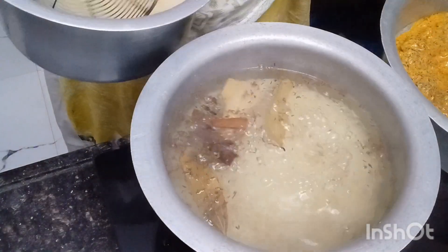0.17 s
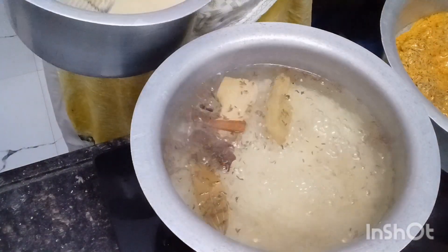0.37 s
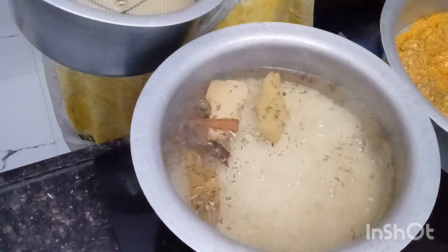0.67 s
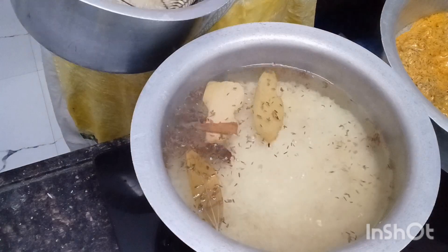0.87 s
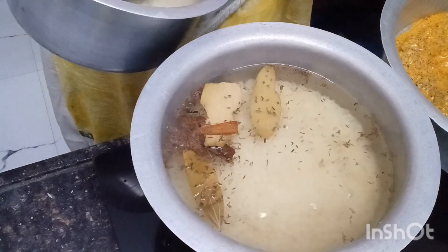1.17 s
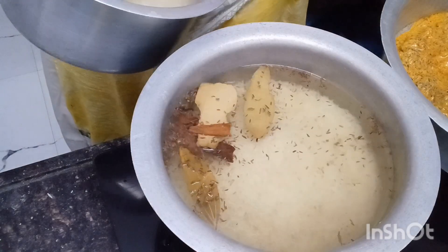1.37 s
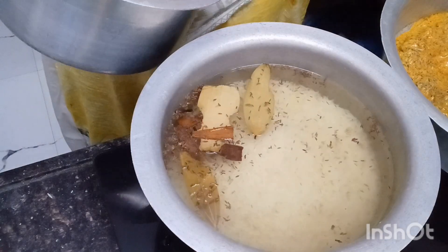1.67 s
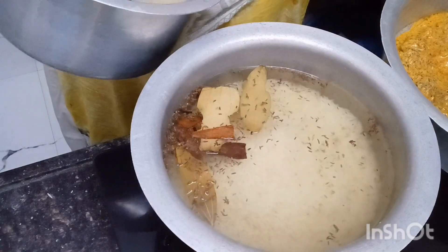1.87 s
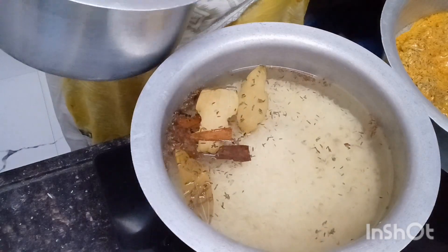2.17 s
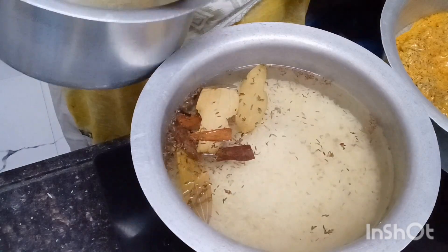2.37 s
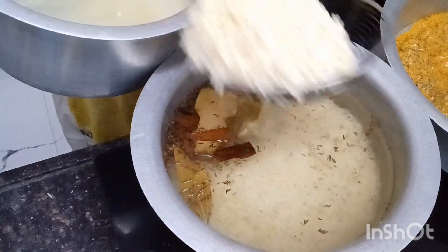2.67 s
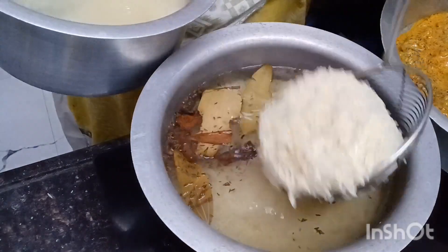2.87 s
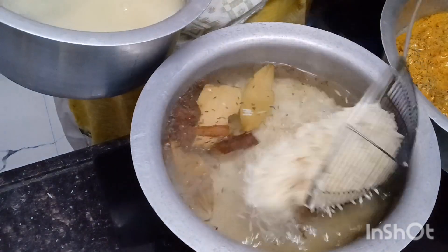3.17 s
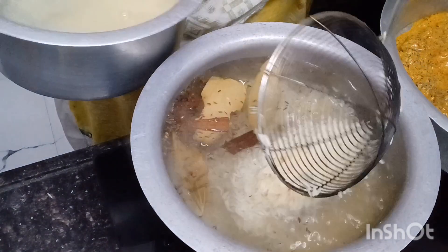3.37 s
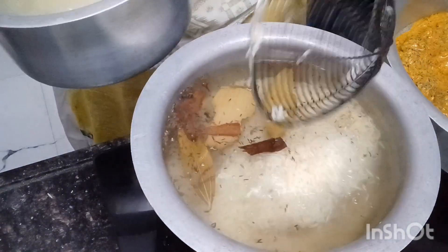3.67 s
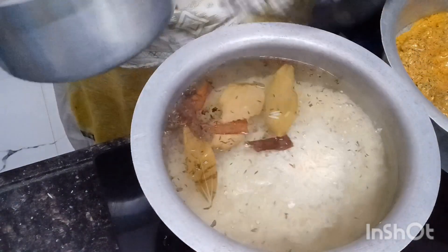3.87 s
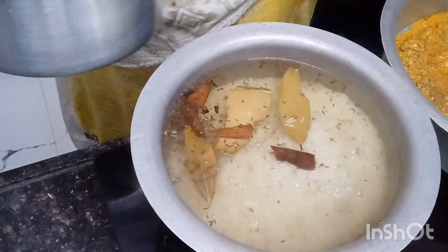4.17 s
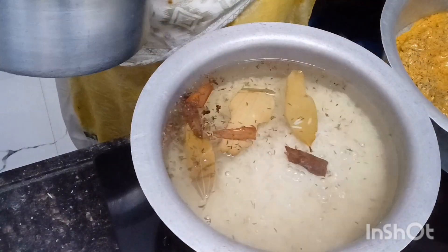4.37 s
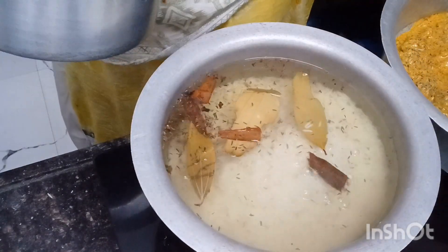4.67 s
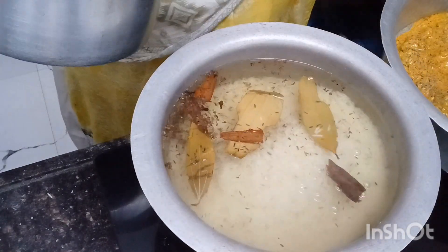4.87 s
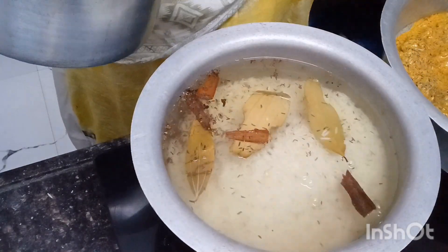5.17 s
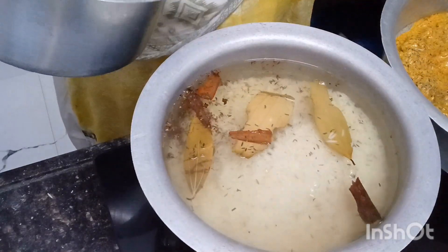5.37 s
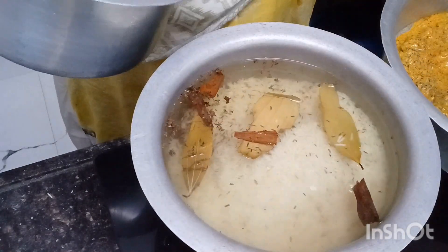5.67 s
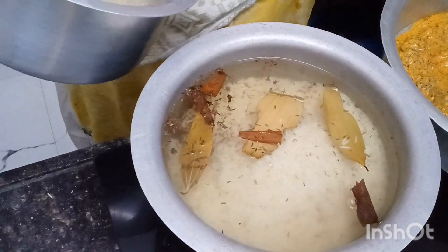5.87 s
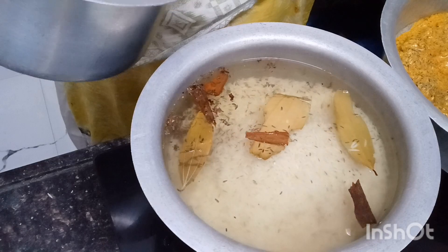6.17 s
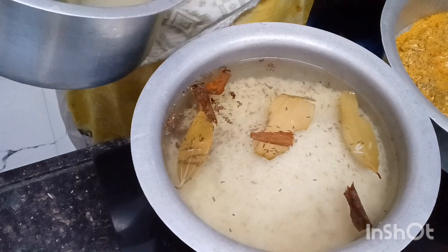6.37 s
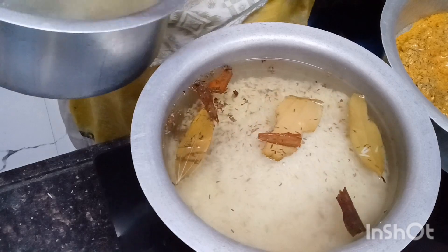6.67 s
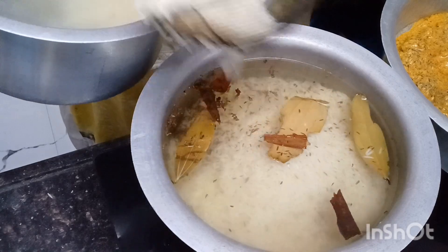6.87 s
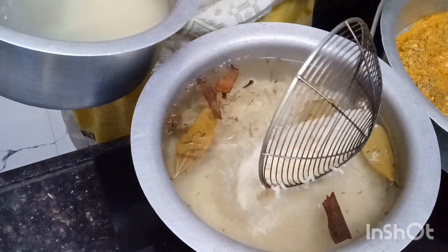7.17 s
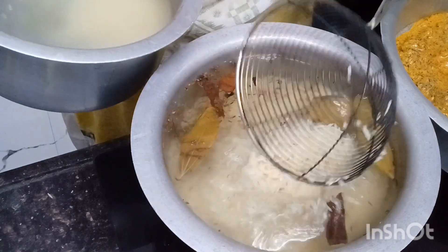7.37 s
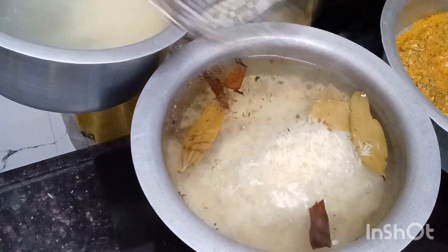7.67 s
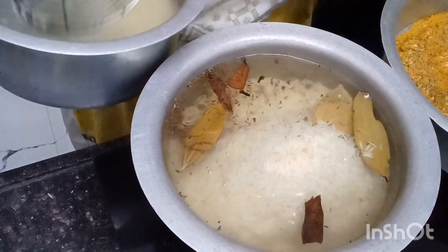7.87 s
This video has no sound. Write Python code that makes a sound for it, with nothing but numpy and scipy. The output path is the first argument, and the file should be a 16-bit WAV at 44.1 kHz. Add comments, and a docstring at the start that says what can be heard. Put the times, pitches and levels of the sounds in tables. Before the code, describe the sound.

In a small, hard, echoing kitchen, a wire skimmer knocks and drags grittily along a thin metal pot, then wet rice plops into water with a short grainy splash near three seconds. After a lull come loud clanks, the strongest ringing just past five, a scrape with gurgles, lighter ticks, a second splash at seven and a final bright clink. Close stereo microphone, slightly left; faint bird, hum and room tone behind.

```python
"""A small hard kitchen: a wire skimmer scrapes wet rice out of a thin metal pot, knocks on its wall
and tips the rice into water. Bursts and gritty slips ring the modes of pot and skimmer; grains are showers
of clicks; drips, gulps, plinks, a brief ring of the struck skimmer and bubbles are short climbing tones.
Brief echoes answer from the room. Behind lie faint whistling hiss, a bird chirping outside, a low hum
and room tone. The stereo microphone colours each side differently."""
import sys
import numpy as np
from scipy import signal
from scipy.fft import rfft, irfft, next_fast_len
from scipy.io import wavfile
from scipy.ndimage import uniform_filter1d

SR = 44100
rng = np.random.default_rng(int(sys.argv[2]) if len(sys.argv) > 2 else 0)


def log_audio(samples):
    """Write samples as a 16-bit WAV file to the path given in sys.argv[1]."""
    # one column per channel
    frames = np.atleast_2d(samples).T
    # limit to full scale, then quantise
    limited = np.clip(frames, -1, 1)
    pcm = np.round(limited * 32767).astype(np.int16)
    wavfile.write(sys.argv[1], SR, pcm)


N = 353682  # length [samples]


def gain_of(db):
    """Decibels to amplitude."""
    return 10 ** (np.asarray(db) / 20)


def evened(x):
    """Scales to rms 1."""
    return x / np.sqrt(np.mean(abs(x) ** 2) + 1e-20)


def unit(x):
    """Scales a response to energy 1."""
    return x / np.sqrt(np.sum(x ** 2, -1, keepdims=True) + 1e-20)


def read(points, hz):
    """Table value on a log-frequency axis."""
    f, value = np.transpose(points)
    return np.interp(np.log(hz + 1), np.log(f + 1), value)


def add(mix, s, sound):
    """Mixes a sound in at time s [s]."""
    part = mix[..., max(round(s * SR), 0):][..., :sound.shape[-1]]
    part += sound[..., :part.shape[-1]]


def played(rows):
    """Start time, and the curve columns at every sample of their span."""
    s, *columns = np.transpose(rows)
    t = np.arange(s[0], s[-1], 1 / SR)
    return s[0], [np.interp(t, s, c) for c in columns]


def resonate(x, hz, width):
    """Shifts the curve hz down to zero, smooths, and shifts back: a resonance of gain 1."""
    turn = np.exp(2j * np.pi * np.cumsum(hz * np.ones(len(x))) / SR)
    r = np.exp(-np.pi * width / SR)
    return 2 * (turn * signal.lfilter([1 - r], [1, -r], x / turn + 1e-18)).real


def causal(points, size=2048):
    """Minimum-phase response of a spectrum."""
    hz = abs(np.fft.fftfreq(size, 1 / SR))
    log_gain = np.log(gain_of(np.maximum(read(points, hz), -100)))
    return np.fft.ifft(np.exp(log_gain - 1j * signal.hilbert(log_gain).imag)).real[:size // 2]


def grit(count, per_s, spread_db):
    """Random tiny clicks, a few of them large."""
    loudness_db = spread_db * np.minimum(rng.exponential(1, count), 5)
    size = gain_of(loudness_db) * rng.choice([-1., 1.], count)
    return evened(size * (rng.random(count) < per_s / SR))


def lumps(count, seconds, depth_db):
    """Uneven random surges of level."""
    span = max(round(seconds * SR), 1)
    wander = uniform_filter1d(uniform_filter1d(rng.standard_normal(count), span), span)
    return evened(gain_of(depth_db * evened(wander)))


def noise_bands(rows):
    """Narrow wavering bands of noise."""
    size = next_fast_len(N, True)
    hz = np.fft.rfftfreq(size, 1 / SR)
    shape = sum(gain_of(db) * unit(1 / (1 + (2 * (hz - f) / width) ** 2)) for f, width, db in rows)
    spectrum = rfft(rng.standard_normal(size), norm="ortho") * np.sqrt(2)
    return size / 2 * irfft(shape * spectrum, size)[:N]


# how long the kitchen rings: (frequency [Hz], t60 [s])
KITCHEN_DECAY = [(300, 0.46), (1000, 0.41), (3000, 0.5), (7000, 0.35), (14000, 0.29)]
# how alike its echoes are left and right: (frequency [Hz], likeness [0-1])
KITCHEN_LIKENESS = [(300, 0.81), (800, 0.6), (1500, 0.018)]


def kitchen(wet_db, lag_s):
    """Direct sound, later at the right port, and sparse echoes whose bands die at their own speed."""
    taps = np.zeros((2, SR // 2))
    at = np.arange(60, SR // 2 - 20, 20)
    at = at + rng.integers(0, 20, (2, len(at)))
    np.put_along_axis(taps, at, rng.choice([-1., 1.], at.shape), 1)
    hz, t, z = signal.stft(taps, SR, nperseg=256)
    same = np.clip(read(KITCHEN_LIKENESS, hz), -1, 1)[:, None]
    z = np.array([z[0], same * z[0] + np.sqrt(1 - same ** 2) * z[1]])
    dying = gain_of(-60 * t / read(KITCHEN_DECAY, hz)[:, None])
    tail = signal.istft(z * dying, SR, nperseg=256)[1]
    direct = np.zeros_like(tail)
    direct[0, 0] = direct[1, max(round(lag_s * SR), 0)] = 1
    return unit(direct + gain_of(wet_db) * unit(tail))


# the five bands thud, boom, clang, clink, fizz: centre [Hz]
BAND_HZ = [200, 550, 1400, 3700, 10000]


def through(drive, body, room):
    """Each band of the drive excites its own part of the body, heard in the room; bands cross-fade."""
    size = next_fast_len(N + SR, True)
    hz = np.fft.rfftfreq(size, 1 / SR)
    heard = rfft(body, size) * rfft(room, size)
    parts = (evened(heard * read(list(zip(BAND_HZ, row)), hz)) for row in np.eye(len(BAND_HZ)))
    return irfft(sum(rfft(d, size) * p for d, p in zip(drive, parts) if d.any()), size)[:, :N]


def ringing(modes, colour):
    """Response of a metal body: its modes stand over a broad colour."""
    click = np.eye(1, 16384)[0]
    modal = sum(gain_of(db) * resonate(click, hz, width) for hz, width, db in modes)
    return signal.fftconvolve(click + modal, causal(colour))


# blows: (time [s], relative clang level [dB], brightness [dB/octave], narrowness [dB/octave^2],
#         rattle t60 [s], left over right [dB], energy share of the skimmer [0-1])
KNOCKS = [(0.237, -34.5, 4.5, 1.5, 0.051, 5, 0.03), (0.527, -13.5, 2.5, 1.5, 0.07, 4.5, 0.37),
          (1.677, -10.5, 2.5, 0.5, 0.029, 2.5, 0.71), (2.41, -20, -2, 0.5, 0.28, 2.5, 0.45),
          (2.678, -44.5, 5.5, 1.5, 0.054, 1, 0.93), (2.739, -27.5, 6.5, 3, 0.11, 2, 0.35),
          (2.798, -27, 3.5, 1.5, 0.023, 4, 0.54), (2.921, -23.5, 9.5, 2.66, 0.056, 0.5, 0),
          (3.04, -28, -6.5, 2.5, .1, 3, 0.14), (4.269, -29.5, 8, 5.5, 0.25, 4, 0.4),
          (4.569, -1.5, 4.5, 1.24, 0.03, 2, 0.43), (5.024, -5.5, 2.5, 0.87, 0.046, 1.5, 0.26),
          (5.104, 7.5, 1.27, 1.27, 0.19, 2, 0.01), (5.319, -10, 0.5, 1, 0.063, 5, 0.56),
          (5.819, -27.5, 3, 1.5, 0.052, 11, 0.03), (5.921, -29, 4.5, 2.4, 0.035, 5, 0.7),
          (6.368, -30, 2.5, 1., 0.055, 6, 0), (6.528, -37.5, 6.5, 2.5, 0.094, 7, 0.5),
          (6.768, -35, 7, 3.5, 0.11, 12.5, 0.8), (7.137, -31.5, 7, 0.9, 0.36, 2, 0.4),
          (7.728, -49, 5, 0.5, 0.041, -2, 0.05), (7.943, -1.5, 4.5, 1.08, 0.029, 2, 1)]
# colour that all blows share, thud to fizz: level [dB]
BLOW_COLOUR_DB = [-2.5, 2, 1, 0.5, 1.5]


def knock(pot, skimmer):
    """Each blow is a sharp crack and a dying rattle, its energy split between pot and skimmer."""
    t = np.arange(SR // 3) / SR
    octaves = np.log2(np.array(BAND_HZ) / BAND_HZ[2])
    for s, db, bright_db, narrow_db, t60, pan_db, share in KNOCKS:
        rattle = grit(len(t), 9000., 2.35) * gain_of(-60 * t / max(t60, .004))
        rattle[0] += 8.0  # the first contact is one sharp crack
        band_db = db + np.array(BLOW_COLOUR_DB) + bright_db * octaves - narrow_db * octaves ** 2
        blow = gain_of(band_db)[:, None, None] * gain_of([[pan_db / 2], [-pan_db / 2]]) * unit(rattle)
        share = np.clip(share, 0, 1)
        add(pot, s, np.sqrt(1 - share) * blow)
        add(skimmer, s, np.sqrt(share) * blow)


# wire dragged along the wall, one curve a stroke:
# (time [s], relative clang level [dB], boom against the clang [dB])
SCRAPES = [
    [(0.56, -63, -3), (0.574, -50.5, -12), (0.724, -38.5, -23), (0.782, -38, -9), (0.85, -41, -8.5),
     (0.992, -49, -5), (1.148, -42.5, -5.5), (1.3, -56, -16.5), (1.66, -62, -5.5)],
    [(4.68, -49, 10), (4.702, -57, 12), (4.768, -31.5, -4.5), (4.834, -49, -6), (5.0, -89.5, -6)],
    [(5.32, -46, 0), (5.324, -36, -9), (5.384, -39.5, -13.5), (5.608, -39.5, -2), (5.62, -38, -3),
     (5.668, -51.5, -27), (5.766, -57.5, -3.5), (6.234, -71, -5.5), (6.3, -91, -7)],
]
# colour of each stroke: (thud against the boom [dB], clink and fizz each against the clang [dB])
STROKE_COLOUR = [(-16.5, -3.5, -13.5), (-12., -2., -12), (-24, -4., -12.5)]


def scrape(pot):
    """Dragged wire slips and catches on the wall; its treble swings less in level than its clang."""
    hard_db, thinning = -44, 0.067  # clang level of no change; share of the swing the treble is spared
    for rows, (thud_db, clink_db, fizz_db) in zip(SCRAPES, STROKE_COLOUR):
        s, (clang_db, boom_db) = played(rows)
        count = len(clang_db)
        catching = lumps(count, 0.0087, 3.)  # the drag catches and lets go
        slips = gain_of(clang_db) * grit(count, 5000., 3.46) * catching * signal.windows.tukey(count, .05)
        lift_db = thinning * (hard_db - clang_db)
        levels_db = (boom_db + thud_db, boom_db, 0, clink_db + lift_db, fizz_db + lift_db)
        bands = np.array([gain_of(db) * slips for db in levels_db])
        add(pot, s, bands[:, None] * gain_of([[4.0], [1.5]]))


# modes of the pot wall: (frequency [Hz], width [Hz], level over the plain colour [dB])
POT_MODES = [(335.5, 26, 10.5), (456, 13, 8.5), (533, 3.9, 14.5), (623, 21, 2), (676.7, 37, 14),
             (754, 19, 2.5), (932.7, 4.6, 17.5), (1040, 48, 6.5), (1319, 59, 3.5), (1414, 30, 5.5),
             (1470, 16, -9), (1555, 95, -5), (1617, 15, 8), (1930, 3.2, 10), (2394, 98, -0.5),
             (2596, 40, -4.5), (2886, 43, -7), (3355, 10, -19), (4240, 81, -4)]
# broad colour of the pot: (frequency [Hz], relative level [dB])
POT_COLOUR = [(88, -38.5), (150, -20), (401, -13), (669, -6.5), (864, -5.5), (1560, 4), (2090, -3),
              (4160, -10.5), (13000, -27), (15600, -35), (16500, -67)]
# modes of the wire skimmer: (frequency [Hz], width [Hz], level over the plain colour [dB])
SKIMMER_MODES = [(529, 7.9, 16), (806, 11, 9), (1212, 17, 27.5), (1635, 42, 22), (1860, 4.6, 8),
                 (2290, 10, 1), (3030, 63, 13), (3725, 150, 3.5), (3720, 25, -3), (4020, 40, 3),
                 (4155, 40, -6), (4760, 380, 2.5), (5430, 77, -12), (5300, 90, -0.5)]
# broad colour of the skimmer: (frequency [Hz], relative level [dB])
SKIMMER_COLOUR = [(88, -58), (150, -4), (401, -2), (508, 13), (752, -26.5), (1530, -3.5), (2500, -6.5),
                  (3630, 20.5), (14400, -2), (15600, -8), (16500, -71)]


def metal():
    """Pot and skimmer share each blow; the drag of the wire rings the pot."""
    pot, skimmer = np.zeros((5, 2, N)), np.zeros((5, 2, N))
    knock(pot, skimmer)
    scrape(pot)
    return (through(pot, ringing(POT_MODES, POT_COLOUR), kitchen(wet_db=1.5, lag_s=.0003))
            + through(skimmer, ringing(SKIMMER_MODES, SKIMMER_COLOUR), kitchen(wet_db=5.0, lag_s=.0002)))


# sharp dry ticks of wire on metal and of single grains:
# (time [s], relative level [dB], pitch [Hz], left over right [dB])
TICKS = [(1.678, -16, 4500, -2), (2.937, -24, 5260, -3), (4.568, -10.5, 4640, 3), (5.107, -15, 3440, 11),
         (6.767, -41, 5250, 9), (7.137, -30.5, 5370, 9), (7.733, -44, 4760, 1), (7.945, -11, 5700, -3)]


def ticks():
    """A few cycles dying at once, heard mostly direct."""
    out, t = np.zeros((2, N)), np.arange(200) / SR
    dying = np.exp(-t / .0004)
    for s, db, hz, pan_db in TICKS:
        sides = gain_of(db + np.array([[.5], [-.5]]) * pan_db)
        add(out, s, sides * np.sin(2 * np.pi * hz * t) * dying)
    return signal.fftconvolve(out, kitchen(wet_db=-5, lag_s=.0002), axes=1)[:, :N]


def slosh():
    """Water stirred by the skimmer gurgles: bubbles of random size whose pitch climbs."""
    stir, out, t = np.zeros(N), np.zeros(N), np.arange(2500) / SR
    for rows in SCRAPES:
        s, (clang_db, boom_db) = played(rows)
        add(stir, s, gain_of(clang_db + boom_db))
    pops, sizes = stir * grit(N, 140., 4.6), rng.integers(0, 8, size=N)
    for k, hz in enumerate(np.geomspace(420., 1300., 8)):
        tone = np.sin(2 * np.pi * hz * (t + 2.4 * t ** 2))
        bubble = unit(tone * np.exp(-t * hz / 9.4) * (1 - np.exp(-t / 0.0037)))
        out += signal.oaconvolve(pops * (sizes == k), bubble)[:N]
    room = kitchen(wet_db=-3.0, lag_s=0.00025)
    return gain_of(-5.5) * signal.fftconvolve(out[None], room, axes=1)[:, :N]


# water trickles and rice patters into it:
# (start [s], hold [s], relative patter level [dB], dying [dB/s], fizz against the patter [dB])
POURS = [(0.0, 0.15, -75, 60., 1.5), (0.3, 0.34, -71.5, 150., -0.5), (2.93, 0.02, -52, 72, -0.5),
         (3.077, 0.038, -60.5, 40, 0.5), (3.5, 0.031, -70.5, 136.5, -8), (1.878, 0.025, -70.5, 112, -9),
         (5.973, 0.024, -60.5, 81, -32), (6.613, 0.17, -76, 154, -5), (6.987, 0.017, -62, 200., -5),
         (7.134, 0.015, -56, 80, 0), (7.313, 0.017, -53, 150, -6), (7.527, 0.035, -88, 204, -7)]
# broad colour of rice in water: (frequency [Hz], relative level [dB])
RICE_COLOUR = [(530, -58), (900, -12), (1280, -6), (1500, -8), (1670, -6), (2660, 5), (6460, -6),
               (8980, -16), (12900, -20), (15700, -25), (16500, -76)]


def rice():
    """Grains and drops patter into the water as tiny clicks; each shower rises, holds and dies."""
    rise_s, clang_db = 0.0065, -7.5  # clang: the low part of a shower, under its patter
    t, drive = np.arange(N) / SR, np.zeros((5, 2, N))
    clumps = lumps(N, 0.0092, 7.7)
    grains = grit(N, 2500., 4.3) * clumps * gain_of([[4.5], [1.5]])
    for s, hold, db, dying_db, fizz_db in POURS:
        fall_db = dying_db * np.maximum(t - s - hold, 0)
        flow = gain_of(db - fall_db) * np.clip((t - s) / rise_s, 0, 1)
        drive[2:] += gain_of([clang_db, 0, fizz_db])[:, None, None] * flow * grains
    return through(drive, causal(RICE_COLOUR), kitchen(wet_db=2.5, lag_s=.0001))


# short tones: drips, gulps, small plinks, and a brief ring of the struck skimmer:
# (time [s], relative level [dB], starting pitch [Hz], t60 [s])
SHORT_TONES = [(2.46, -44, 1793, 0.16), (2.486, -43.5, 1470, 0.098), (2.743, -27, 1360, 0.024),
               (2.80, -39.5, 1825, 0.045), (2.83, -34, 1035, 0.054), (3.90, -53.5, 810, 0.36),
               (3.957, -45.5, 1810, 0.24), (3.957, -52.5, 2250, 0.28), (4.23, -60, 1930, 0.16),
               (6.804, -41, 1230, 0.067), (6.973, -37.5, 3460, 0.02), (7.007, -33, 3070, 0.018),
               (7.362, -44, 1540, 0.062), (3.088, -26, 3110, 0.012), (7.385, -31, 3700, 0.011),
               (6.5, -39, 4300, 0.011), (7.945, -30, 1690, 0.13), (4.77, -35, 790, 0.061),
               (5.58, -27.5, 660, 0.14), (5.609, -29, 560, 0.12), (5.42, -32, 520, 0.13),
               (5.56, -34, 760, 0.078), (5.63, -34, 703, 0.1), (4.83, -35, 930, .1)]


def short_tones():
    """A short dying tone, climbing slightly, blurred by a narrow band of noise around its pitch."""
    out, t = np.zeros(N), np.arange(SR // 4) / SR
    for s, db, hz, t60 in SHORT_TONES:
        tone = np.sin(2 * np.pi * hz * (t + 0.38 * t ** 2))
        blur = evened(resonate(rng.standard_normal(len(t)), hz, 0.085 * hz))
        add(out, s, gain_of(db - 60 * t / t60) * (tone + 0.73 * blur) * (1 - np.exp(-t / 0.0021)))
    return signal.fftconvolve(out[None], kitchen(wet_db=-2.5, lag_s=.0001), axes=1)[:, :N]


# faint narrow bands of hiss, one curve each, the last one climbing:
# (time [s], relative level [dB], centre [Hz])
WHISTLES = [
    [(3.1, -66, 2520), (3.8, -78, 2550), (4.0, -60.5, 2390)],
    [(7.15, -66, 2670), (7.382, -64, 2534), (7.8, -92, 2530)],
    [(3.58, -77, 1310), (3.95, -62, 1356), (4.3, -63, 1515), (4.56, -61.5, 1540), (5.04, -66, 1730)],
]


def whistles():
    """Noise twice through one moving resonance."""
    out = np.zeros((2, N))
    for rows, width_hz in zip(WHISTLES, (90., 90., 170.)):
        s, (db, hz) = played(rows)
        hiss = [rng.standard_normal(len(hz)) for _ in range(2)]
        hiss = [evened(resonate(resonate(x, hz, width_hz), hz, width_hz)) for x in hiss]
        add(out, s, gain_of(db + 2.0) * np.array(hiss) * signal.windows.tukey(len(hz), .1))
    return out


# chirps of the bird outside: (time [s], relative level [dB], extra fading [dB/s])
CHIRPS = [(2.565, -51, 70), (4.41, -51, 36), (6.615, -50, 10), (7.84, -52, 38)]
# course of every chirp, dropping onto a held note: (time [s], pitch [Hz], level against the chirp's [dB])
CHIRP_COURSE = [(0, 4100, -11), (.03, 3573, -11.5), (.08, 3550, -15.5), (.33, 3510, -21)]


def bird():
    """A near sine, roughened by echoes outdoors, which are noise kept narrow around its pitch."""
    _, (hz, db) = played(CHIRP_COURSE)
    out, t = np.zeros((2, N)), np.arange(len(hz)) / SR
    tone = np.sin(2 * np.pi * np.cumsum(hz) / SR)
    for s, level_db, fade_db in CHIRPS:
        fuzz = [evened(resonate(rng.standard_normal(len(hz)), hz, 77.0)) for _ in range(2)]
        fading = gain_of(level_db + db - fade_db * t) * signal.windows.tukey(len(hz), .08)
        add(out, s, fading * (tone + 1.05 * np.array(fuzz)))
    return out


# steady low bands: (frequency [Hz], width [Hz], relative level [dB])
HUM_BANDS = [(148.4, 25, -72.5), (197.3, 18, -79.5), (333.2, 9.1, -74), (481.2, 4.4, -78.5)]
# rumble beneath them: (frequency [Hz], width [Hz], level against the rumble curve [dB])
RUMBLE_BANDS = [(43.8, 38, -4.5), (81.7, 11.4, -1)]
# course of the rumble: (time [s], relative level [dB])
RUMBLE_LEVEL = [(0, -59.5), (1.8, -64.5), (2.4, -59.5), (3.8, -70), (4.7, -58), (6.4, -64), (8.02, -61)]


def hum():
    """Steady narrow low bands over a swelling rumble, stronger on the left."""
    level_db = np.interp(np.arange(N) / SR, *np.transpose(RUMBLE_LEVEL))
    swell = gain_of(level_db) * lumps(N, seconds=0.13, depth_db=1.5)
    return (swell * noise_bands(RUMBLE_BANDS) + noise_bands(HUM_BANDS)) * gain_of([[2.5], [-3.5]])


# colour of the room tone: (frequency [Hz], relative level [dB])
AIR_COLOUR = [(18, -28), (30, -7), (80, -0.5), (248, -9), (323, -7.5), (378, -7.5), (480, -12.5),
              (608, -13), (1340, -16), (2220, -25), (4900, -25), (8990, -25.5), (11100, -24.5),
              (15200, -35), (16500, -27.5)]
# how alike it is left and right: (frequency [Hz], likeness [0-1])
AIR_LIKENESS = [(60, 0.41), (180, 0.94), (550, 0.47), (1650, 0), (4970, 0), (15000, 0.053)]
# its lean to the left: (frequency [Hz], left over right [dB])
AIR_LEAN = [(60, 4.1), (240, 5.8), (950, 4.9), (3770, 5.3), (15000, 7)]


def air():
    """Room tone: noise shaped by frequency, its level drifting in patches of time and pitch."""
    frames, hz = N // 256 + 5, np.fft.rfftfreq(1024, 1 / SR)
    a, b, c, d, patches = rng.standard_normal((frames, 513, 5)).T
    patches = evened(uniform_filter1d(uniform_filter1d(patches, size=20, axis=0), size=30, axis=1))
    same, left = np.clip(read(AIR_LIKENESS, hz), -1, 1)[:, None], a + 1j * b
    z = np.array([left, same * left + np.sqrt(1 - same ** 2) * (c + 1j * d)])
    lean_db = np.array([.5, -.5])[:, None, None] * read(AIR_LEAN, hz)[:, None]
    z *= gain_of(read(AIR_COLOUR, hz)[:, None] + 2.55 * patches + lean_db)
    tone = signal.istft(z, nperseg=1024, noverlap=768)[1][:, :N]
    return gain_of(-63.5) * evened(tone)


def scene():
    """All sources together, from the pot at the front to the room tone behind."""
    return metal() + ticks() + slosh() + rice() + short_tones() + whistles() + bird() + hum() + air()


# colour of the two microphone ports: (frequency [Hz], left level [dB], right level [dB])
PORT_COLOUR = [(494, -1, -1), (2100, -2, -5), (6230, 2, 2), (9940, -12.5, 2.5), (11760, 1.5, 7),
               (15500, 2.5, 6.5)]


def record(dry):
    """Each microphone port has its own colour and drops the deepest bass; then the recorder's band limit."""
    hz, *port_db = np.transpose(PORT_COLOUR)
    ports = [causal(list(zip(hz, db)), size=512) for db in port_db]
    coloured = signal.oaconvolve(dry, ports, axes=1)[:, :N]
    thinned = signal.sosfilt(signal.butter(4, 40., "high", fs=SR, output="sos"), coloured)
    band_limit = signal.firwin(511, 16000, window=("kaiser", 9), fs=SR)
    return signal.oaconvolve(thinned, band_limit[None], "same")


dry = scene()
out = record(dry)
log_audio(out)
```